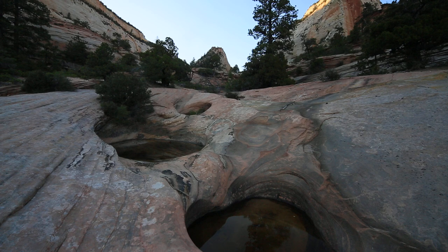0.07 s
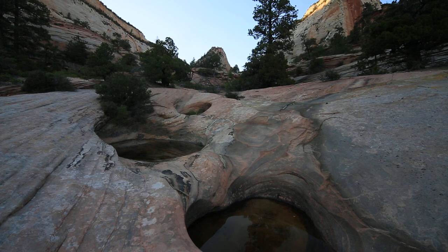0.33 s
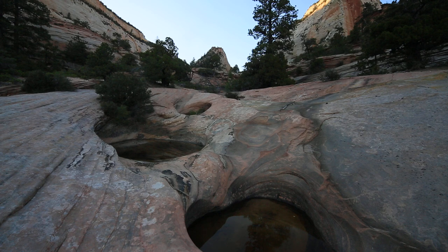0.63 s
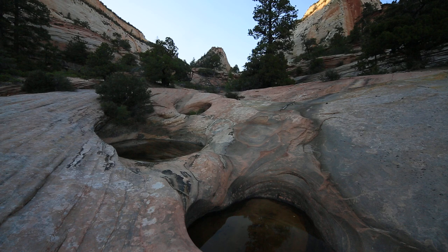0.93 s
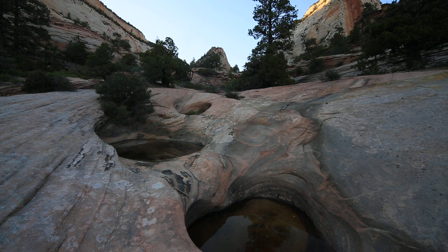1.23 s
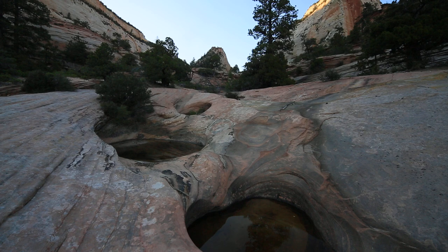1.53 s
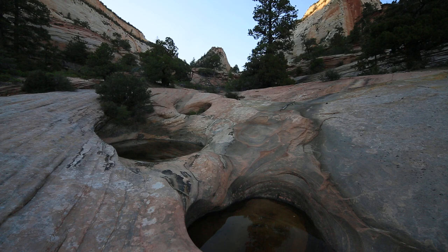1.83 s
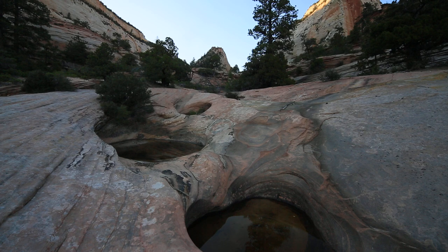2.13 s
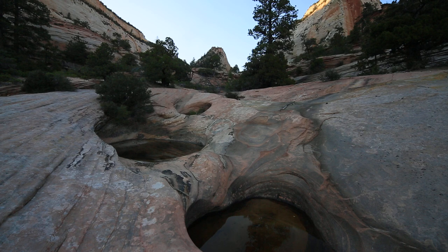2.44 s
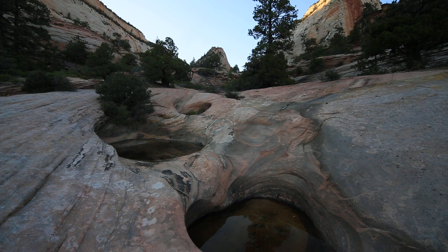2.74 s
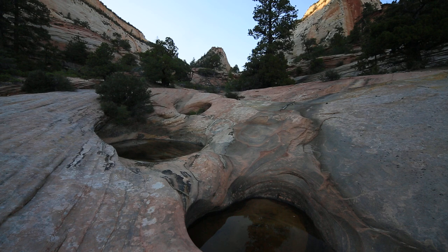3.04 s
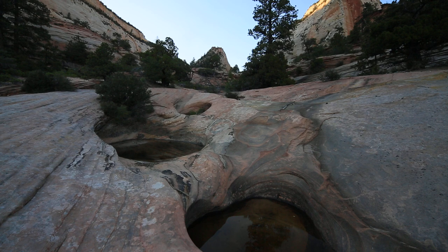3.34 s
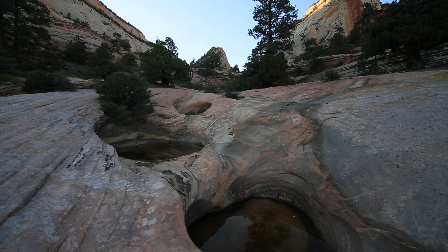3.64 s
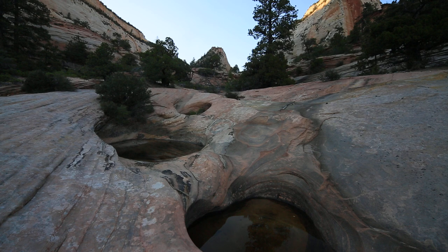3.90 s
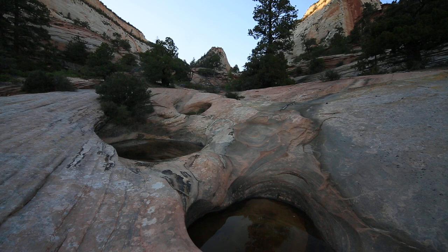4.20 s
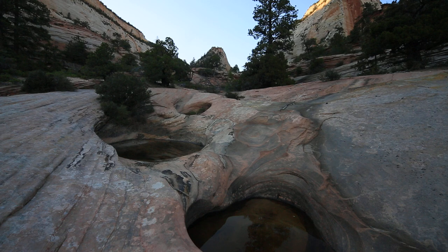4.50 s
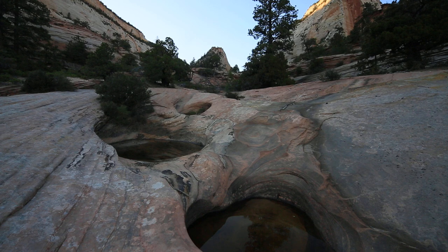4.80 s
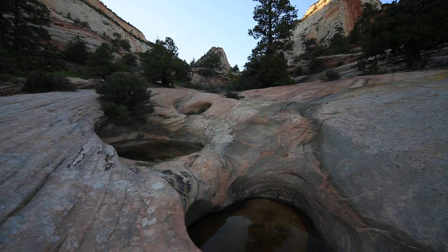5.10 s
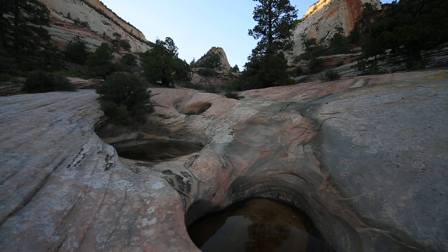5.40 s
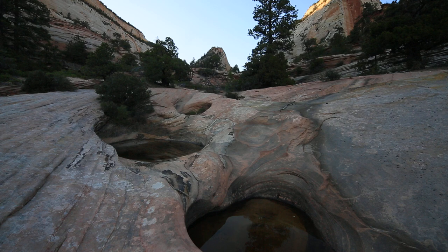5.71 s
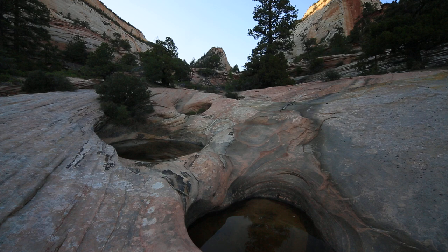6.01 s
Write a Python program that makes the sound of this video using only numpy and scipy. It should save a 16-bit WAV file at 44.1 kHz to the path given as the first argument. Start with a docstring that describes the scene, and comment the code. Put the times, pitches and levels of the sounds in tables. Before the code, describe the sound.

A small chorus of frogs trades rapid, bleating rattles by canyon pools, two close and others distant, with a faint echo.

```python
"""Tree frogs trill at rock pools in a canyon, over a soft rumble of air. A close frog and a distant one
open; a close rival joins in, then faint high chirps. Near 3 s a shrill frog calls and a soft trill
swells, leading into the close pair's calls. Two distant frogs follow; the close one ends among chirps.
Each note is a rising hum of the vocal folds that breaks into sharp beats, ringing throat and vocal sac.
Bare rock scatters the notes and a canyon wall sends them back."""
import sys
import numpy as np
from scipy import signal
from scipy.fft import rfft, irfft, next_fast_len
from scipy.io import wavfile

SR = 44100
rng = np.random.default_rng(int(sys.argv[2]) if len(sys.argv) > 2 else 0)


def digitize_waveform(pressure):
    """Quantize a signal to 16-bit integers and store it at the path in sys.argv[1].

    Rows of a 2-D input are taken as channels; values are limited to [-1, 1].
    """
    field = np.atleast_2d(pressure).T
    bounded = np.clip(field, -1, 1)
    quanta = np.round(bounded * 32767).astype(np.int16)
    wavfile.write(sys.argv[1], SR, quanta)


N = 271215
NOTE_SIZE, NOTE_MIDDLE = 4096, 1536  # samples: a note's buffer, and where its middle falls


def close_frogs():
    """Two rivals at the nearest pools; the second sits among hard rock faces."""
    # (first note [s], last note [s], slowing [share], last-note lag [s], level [dB], crescendo [dB])
    near_calls = [(-.1335, .2532, 0.0097, 0.0045, -18.5, 1.5), (1.0605, 1.9941, 0.02, .0035, -18, -0.1),
                  (3.3832, 4.0997, 0.035, .0095, -17.5, .5), (5.4059, 6.1225, .014, 0.0017, -17.5, 0.6)]
    rival_calls = [(1.212, 1.963, 0.0277, 0.002945, -23.5, -2), (3.6348, 4.3888, .064, 0.00099, -22.5, 2)]
    # beats of one note: (position from the middle [beats], level [dB])
    near_beats = [(-1, -1.5), (0, 1), (1, -2.4), (2, -14)]
    rival_beats = [(-1, -3), (0, 1), (1, -4), (2, -10)]
    # resonance of throat and sac: (frequency [Hz], gain [dB])
    near_sac = [(310, -34.5), (490, -8.5), (710, -15.5), (960, -27.5), (1170, -21.5), (1430, -7.5),
                (1670, -9.5), (1980, 2), (2290, -8), (2590, -27), (3480, -21), (4220, -29.5), (4750, -55.5),
                (10500, -72)]
    rival_sac = [(295, -26), (505, 0.5), (725, -0.5), (935, -16.5), (1390, -3), (1660, -5), (2060, 3.5),
                 (2840, -9), (3680, -26), (5450, -39), (6750, -47.5), (8700, -44.5), (10200, -67)]
    # early reflections off rock faces: (delay [s], level [dB])
    near_rocks = [(.0031, -11.5)]
    rival_rocks = [(.00395, -6.5), (.0098, -12)]
    notes = trill(near_calls, note_hz=18.2, beat_hz=165.6, opening_db=-3.5, hurry=0.026,
                  timing_s=0.00028, wander=0.0093, level_spread_db=0.4, lean_db=1.2, lean_spread_db=2.5)
    near = frog(notes, near_beats, near_sac, near_rocks, pitch_hz=506.7, glide=6.64, lead_s=0.011,
                swell_s=0.0071, hum_db=-14, buzz_db=-6.5, scatter_db=-14.5, scatter_t60=0.062,
                slack=0.893, ring_db=-35, jitter_s=0.00006, stretch=0.0042, brighten_db=-0.1)
    notes = trill(rival_calls, note_hz=18.6, beat_hz=162.26, opening_db=-1.5, level_spread_db=1.4)
    rival = frog(notes, rival_beats, rival_sac, rival_rocks, pitch_hz=538, glide=8.95, lead_s=0.007,
                 swell_s=0.014, hum_db=-7, buzz_db=1.5, scatter_db=1.5, scatter_t60=0.089,
                 stretch=0.0072, brighten_db=2.5)
    return near + amp(0.78) * rival


def background_trills():
    """Three frogs at other pools, and a soft trill swelling into the rival's call; all well scattered."""
    # (first note [s], last note [s], slowing [share], last-note lag [s], level [dB], crescendo [dB])
    pool_calls = [(-.068, 1.016, 0.07, .003, -32.5, 0.23), (4.429, 5.031, 0.046, 0.003, -31.3, 0.23)]
    shrill_calls = [(2.883, 3.327, -.02, 0, -44.5, 2.5), (3.41, 3.465, 0, 0, -38, -5)]
    swelling_calls = [(3.032, 3.353, 0.00028, 0, -46, 14)]
    far_calls = [(5.106, 5.34, 0.0093, 0, -50.5, 0.27)]
    # beats of one note: (position from the middle [beats], level [dB])
    beats = [(-2, -6), (-1, -1), (0, 1), (1, -1.5), (2, -7.5)]
    # resonance of throat and sac: (frequency [Hz], gain [dB])
    pool_sac = [(290, -32), (560, -1.5), (990, -19), (1320, -6), (1670, -4.5), (2040, -2), (2410, -18),
                (2630, -10.5), (2920, -26.5), (4400, -42.5), (7800, -64)]
    shrill_sac = [(310, -35.5), (570, -17.5), (810, -5), (1060, -15), (1560, -11.5), (1960, -12.5),
                  (2430, -2), (2690, -15), (2980, -23.5), (5800, -47.5)]
    far_sac = [(310, -22), (570, -4.5), (810, 0), (1120, -11.5), (1590, -5.5), (1910, -8), (2260, 0),
               (2680, -23), (4900, -41)]
    # early reflection off a rock face: (delay [s], level [dB])
    rocks = [(.0029, -8)]
    notes = trill(pool_calls, note_hz=16.6, beat_hz=183.55, opening_db=4.5)
    pool = frog(notes, beats, pool_sac, rocks, pitch_hz=580.4, glide=6.31, lead_s=0.012,
                swell_s=0.013, hum_db=-5.5, buzz_db=-5.5, scatter_db=3.5, scatter_t60=0.073)
    notes = trill(shrill_calls, note_hz=18, beat_hz=201, opening_db=-5.5)
    shrill = frog(notes, beats, shrill_sac, rocks, pitch_hz=577, glide=7.3, lead_s=0.0085,
                  swell_s=0.017, hum_db=-2, buzz_db=-13.5, scatter_db=1.5, scatter_t60=0.057, slack=0.68)
    notes = trill(swelling_calls, note_hz=18.6, beat_hz=182.7)
    swelling_trill = frog(notes, beats, far_sac, rocks, pitch_hz=592, glide=2, lead_s=0.0053,
                          swell_s=0.018, hum_db=-0.5, buzz_db=-16, scatter_db=3.5, scatter_t60=0.37)
    notes = trill(far_calls, note_hz=17, beat_hz=194.2)
    far = frog(notes, beats, far_sac, rocks, pitch_hz=570, glide=5.8, lead_s=0.0078,
               swell_s=0.019, hum_db=2, buzz_db=-0.5, scatter_db=0, scatter_t60=0.22)
    return amp(-0.9) * pool + amp(3.5) * shrill + amp(-1.1) * swelling_trill + amp(2.5) * far


def trill(calls, note_hz, beat_hz, opening_db=0, hurry=0, timing_s=0.0007, wander=0.02,
          level_spread_db=1, lean_db=0, lean_spread_db=4, rest_s=0.5, surge_db=0.6, settle_notes=3.1):
    """Phrase calls as notes: (time [s], level [dB], beat rate [Hz], lean [dB], slack sac [yes/no])."""
    notes, previous_end = [], -np.inf
    for first, last, slowing, lag, db, crescendo_db in calls:
        i = np.arange(round((last - first) * note_hz) + 1)
        progress = i / i[-1]
        time_dice, level_dice, rate_dice, lean_dice = rng.standard_normal((len(i), 4)).T
        paced = progress - slowing * progress * (1 - progress) / 2
        times = first + (last - lag - first) * paced + lag * (progress == 1) + timing_s * time_dice
        rested = first - previous_end > rest_s  # the sac goes slack during a rest
        opening = rested & (i == 0)
        accent_db = opening_db * opening + surge_db * rested * (i == 1)  # note two has a full sac
        level = db + crescendo_db * (progress - 0.5) + accent_db + level_spread_db * level_dice
        rate = beat_hz * (1 + hurry * np.exp(-(i / settle_notes) ** 2) + wander * rate_dice)
        lean = lean_db + lean_spread_db * lean_dice  # favours a note's late beats over its early ones
        notes += zip(times, level, rate, lean, opening)
        previous_end = last
    return notes


def frog(notes, beats, body, rocks, pitch_hz, glide, lead_s, swell_s, hum_db, buzz_db, scatter_db,
         scatter_t60, slack=1, ring_db=-95, jitter_s=0.00023, stretch=0, brighten_db=0):
    """One voice: beats and fold overtones ring the sac over a hum; slack < 1 tunes a rested sac down."""
    t, hz = note_axes()
    delay = lambda s: np.exp(-2j * np.pi * hz * s)
    core = np.abs(t - 0.001) < 0.009  # the heart of the note sets the rattle's level
    position, beat_db = np.transpose(beats)
    radiation = hz ** 2 / (hz ** 2 + 230 ** 2) + 0.00091  # a small sac gives off little bass
    treble = hz ** 4 / (hz ** 4 + 3000 ** 4)

    def sac_at(tuning, n):
        """The sac at beat n: stretch shifts its tuning from beat to beat, brighten_db its treble."""
        gain_db = along(body, hz / (tuning + stretch * n)) + brighten_db * n * treble
        return causal(radiation * amp(gain_db))

    taut_sac = np.array([sac_at(1, n) for n in position])
    slack_sac = np.array([sac_at(slack, n) for n in position])
    # the frog sits still, so every note meets the same reflections
    walls = 1 + sum(amp(db) * delay(s) for s, db in rocks)
    spray = rock_scatter(t, scatter_db, scatter_t60)
    usual_rate = np.median([note[2] for note in notes])
    track = np.zeros(N)
    for s, db, rate_hz, lean_db, opening in notes:
        sac = slack_sac if opening else taut_sac
        strike_db = beat_db + lean_db * np.sign(position) / 2
        strike_db -= 9 * opening * np.abs(position)  # a slack sac manages one firm beat
        beat_s = position / rate_hz + jitter_s * rng.standard_normal(len(position))
        strikes = amp(strike_db) @ (sac * delay(beat_s[:, None] - t[0]))
        rattle = irfft(strikes * (walls + spray))
        hum, overtones = vocal_folds(t, pitch_hz, glide, lead_s, swell_s)
        buzz = irfft(rfft(overtones) * sac[0] * (1 + spray))
        ring = throat_ring(t, beat_s, strike_db, tension=(rate_hz / usual_rate) ** 1.3)
        voice = amp(hum_db + 4.6 * opening) * hum + amp(buzz_db) * buzz / np.abs(buzz).max()
        add(track, s, amp(db) * (rattle / rattle[core].std() + voice + amp(ring_db) * ring))
    return track


def vocal_folds(t, pitch_hz, glide, lead_s, swell_s, rolloff=1.8):
    """A hum swelling just ahead of the note's middle; pitch and overtones grow as pressure builds."""
    rising_hz = pitch_hz * (1 + 0.021 * rng.standard_normal()) * np.exp(glide * t)
    phase = 2 * np.pi * np.cumsum(rising_hz) / SR
    phase -= phase[NOTE_MIDDLE]  # the middle beat falls on a cycle of the folds
    pressure = np.exp(-((t + lead_s) / swell_s) ** 4)
    overtones = sum(np.cos(k * phase) / k ** rolloff for k in range(2, 9))
    return pressure * np.sin(phase), pressure * np.exp(0.23 * t / swell_s) * overtones


def throat_ring(t, beat_s, strike_db, tension, sink=4.6, t60=0.019, grow_db=3):
    """Each beat strikes the throat's thin upper modes, which sink as the sac empties."""
    # at mid-note and usual tension: (frequency [Hz], relative level [dB])
    upper_modes = [(6500, 5), (8000, -4)]
    age = np.maximum(t - beat_s[:, None], 0)
    phase = 2 * np.pi * np.cumsum(tension * np.exp(-sink * t) * (age > 0), axis=1) / SR
    modes = sum(amp(db) * np.sin(hz * phase) for hz, db in upper_modes)
    force = amp(strike_db + grow_db * (np.arange(len(strike_db)) - 1))
    return force @ (modes * amp(-60 * age / t60))


def chirps(pitch_hz=4070, fall=2.3, half_width_s=0.0058):
    """A far-off chirper: thin, falling blips with a slightly rough pitch."""
    # (time [s], level [dB])
    chirp_notes = [(2.068, -66), (2.127, -55.5), (5.10, -61), (5.28, -51), (5.341, -57.5), (6.046, -57),
                   (6.097, -58)]
    t, _ = note_axes()
    track = np.zeros(N)
    for s, db in chirp_notes:
        falling_hz = pitch_hz * np.exp(-fall * t) * (1 + 0.092 * rng.standard_normal(len(t)))
        phase = 2 * np.pi * np.cumsum(falling_hz) / SR
        add(track, s, amp(db) * np.exp(-(t / half_width_s) ** 2) * np.sin(phase))
    return track


def rock_scatter(t, level_db, t60):
    """A dense spray of short reflections off uneven rock, as a spectrum."""
    age = t - t[0]
    spray = rng.standard_normal(len(t)) * amp(-60 * age / t60) * np.tanh(age / 0.00078)
    return amp(level_db) * rfft(spray / np.linalg.norm(spray))


def canyon(x, wall_s=0.096, wall_t60=0.56):
    """A blurred echo from the nearest wall and a long, weak tail; distance dulls both."""
    # (frequency [Hz], time to fade by 60 dB [s])
    tail_decay = [(380, 0.6), (2050, 1.03), (5800, 0.3)]
    dulling = [(520, 14), (1250, 4.5), (2250, -4), (3900, -9)]  # (frequency [Hz], gain [dB])
    hz, t, bands = signal.stft(rng.standard_normal(SR), SR, nperseg=256)
    tail = signal.istft(bands * amp(-60 * t / along(tail_decay, hz)[:, None]), SR, nperseg=256)[1]
    age = np.arange(len(tail)) / SR - wall_s
    echo = rng.standard_normal(len(tail)) * (age > 0) * amp(-60 * np.abs(age) / wall_t60)
    response = amp(-30) * tail / np.linalg.norm(tail) + amp(-32) * echo / np.linalg.norm(echo)
    return filtered(signal.fftconvolve(x, response)[:N], lambda f: amp(along(dulling, f)))


def air(level_db=-55.6):
    """A bed of soft rumble and hiss from the open air."""
    # (frequency [Hz], relative level [dB])
    air_colour = [(22, -31.5), (40, -11), (68, 6), (115, -2.5), (220, -4), (480, -0.5), (900, -5),
                  (2000, -9), (4000, -12.5), (8000, -16), (15500, -21.5)]
    bed = filtered(rng.standard_normal(N), lambda hz: amp(along(air_colour, hz)))
    return amp(level_db) * bed / np.sqrt(np.mean(bed ** 2))


def amp(db):
    """Decibels to gain."""
    return 10 ** (np.asarray(db) / 20)


def along(points, hz):
    """Read a curve of (frequency [Hz], value) points on a log axis."""
    f, v = np.transpose(points)
    return np.interp(np.log(hz + 1), np.log(f), v)


def filtered(x, response):
    """Equalise x with a gain given as a function of frequency."""
    m = next_fast_len(N + SR // 2)
    return irfft(rfft(x, m) * response(np.fft.rfftfreq(m, 1 / SR)), m)[:N]


def causal(gain):
    """The response with this gain that rings only after it is struck."""
    cepstrum = irfft(np.log(gain + 1e-6))
    cepstrum[1:NOTE_SIZE // 2] *= 2
    cepstrum[NOTE_SIZE // 2 + 1:] = 0
    return np.exp(rfft(cepstrum))


def add(track, s, sound):
    """Mix a note into the track with its middle at time s."""
    start = round(s * SR) - NOTE_MIDDLE
    lo, hi = np.clip([start, start + len(sound)], 0, N)
    track[lo:hi] += sound[lo - start:hi - start]


def note_axes():
    """Time from a note's middle, and the frequencies of its spectrum."""
    return (np.arange(NOTE_SIZE) - NOTE_MIDDLE) / SR, np.fft.rfftfreq(NOTE_SIZE, 1 / SR)


def scene():
    """The chorus and its canyon echo, with chirps and air behind, in mono."""
    chorus = close_frogs() + background_trills()
    return (chorus + canyon(chorus) + chirps() + air())[None]


def record(dry):
    """A brick-wall low-pass takes off the very top."""
    top_hz = 15800
    return filtered(dry[0], lambda hz: hz < top_hz)[None]


dry = scene()
out = record(dry)
digitize_waveform(out)
```